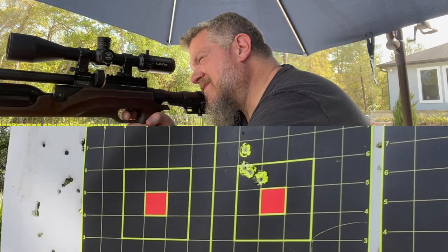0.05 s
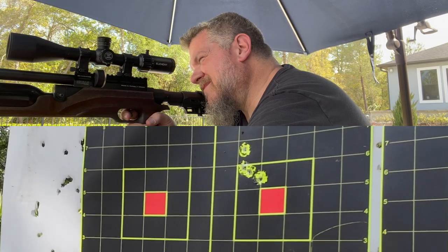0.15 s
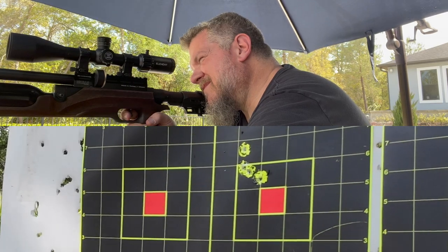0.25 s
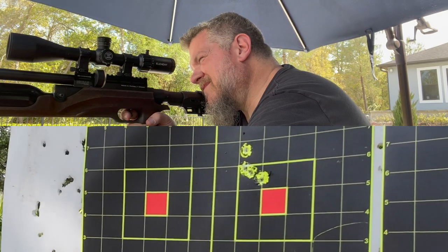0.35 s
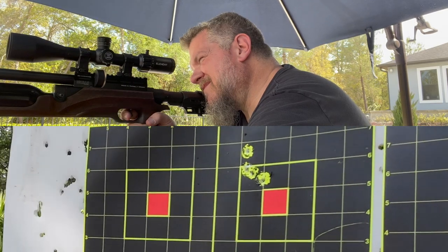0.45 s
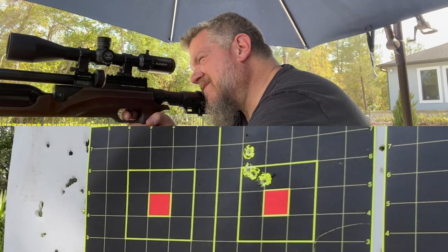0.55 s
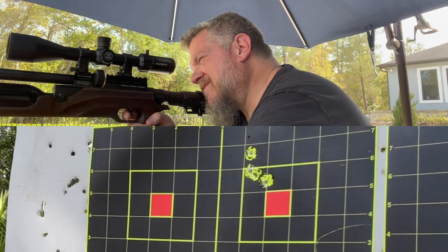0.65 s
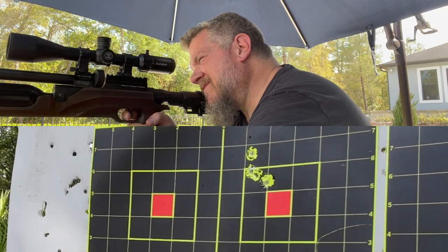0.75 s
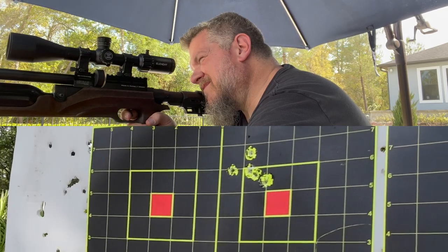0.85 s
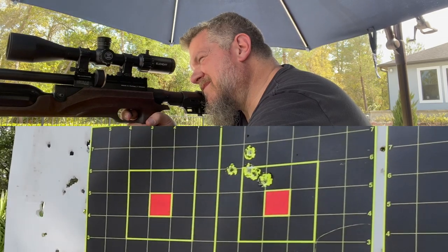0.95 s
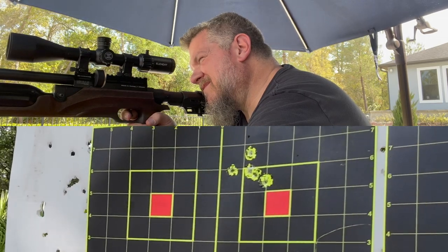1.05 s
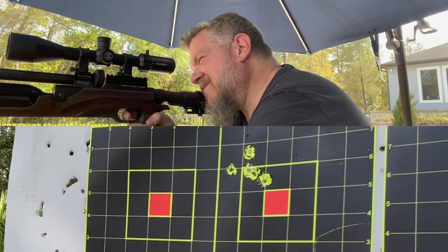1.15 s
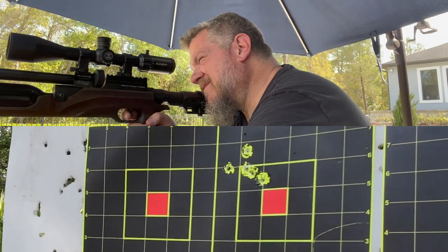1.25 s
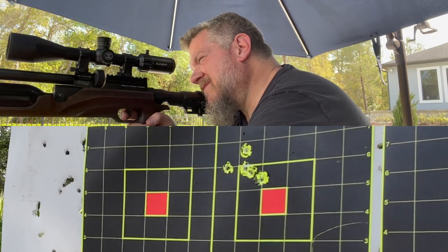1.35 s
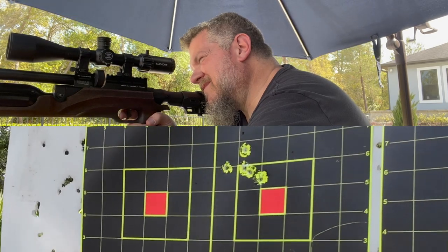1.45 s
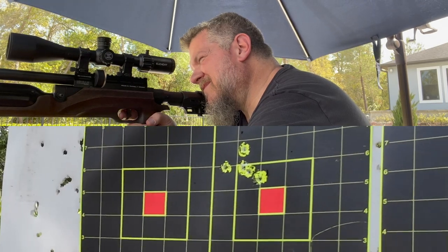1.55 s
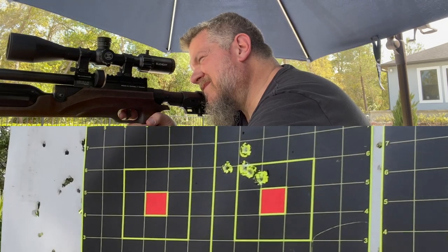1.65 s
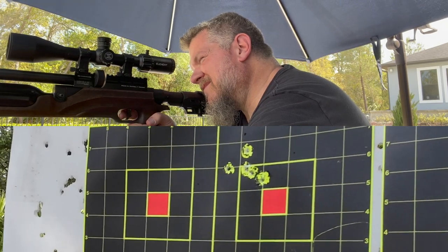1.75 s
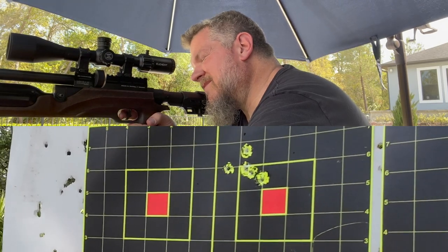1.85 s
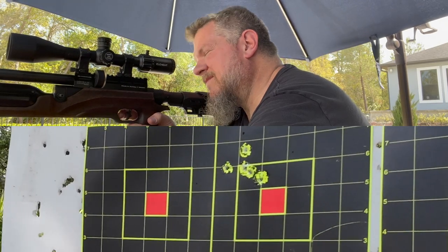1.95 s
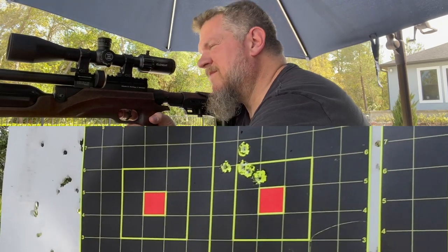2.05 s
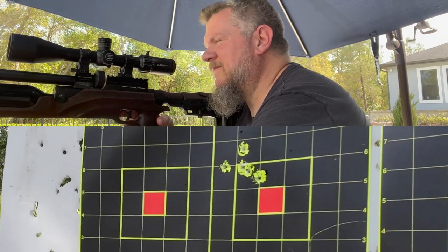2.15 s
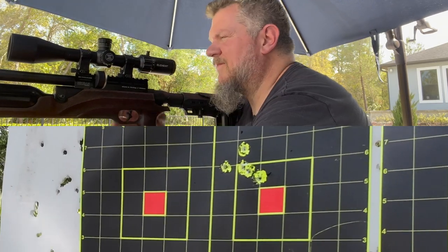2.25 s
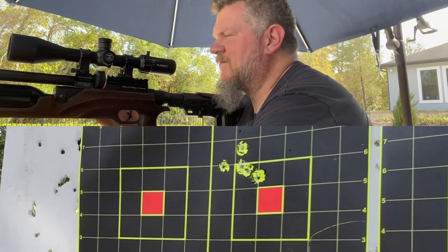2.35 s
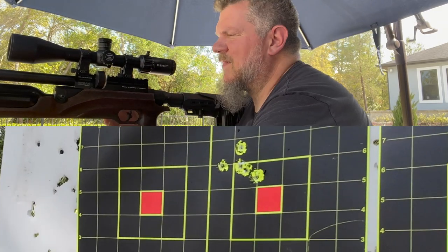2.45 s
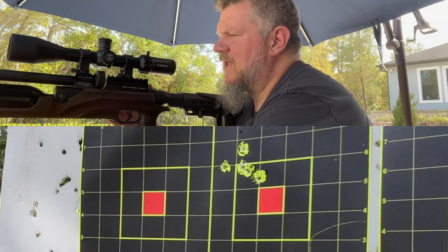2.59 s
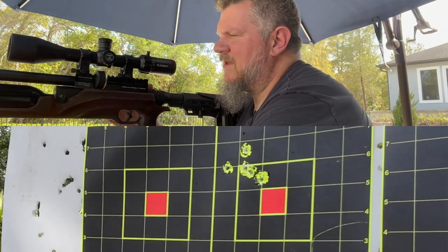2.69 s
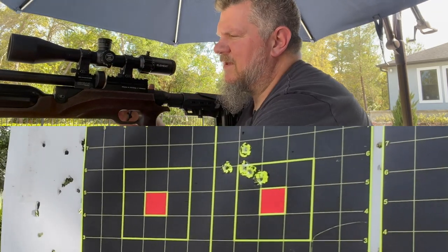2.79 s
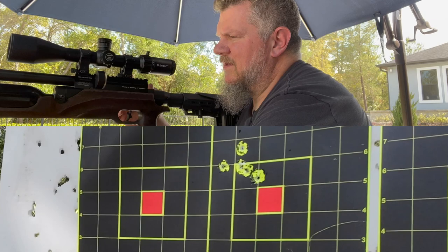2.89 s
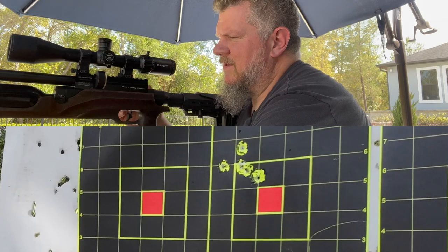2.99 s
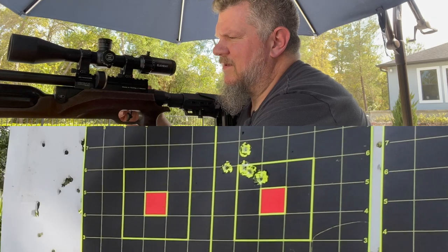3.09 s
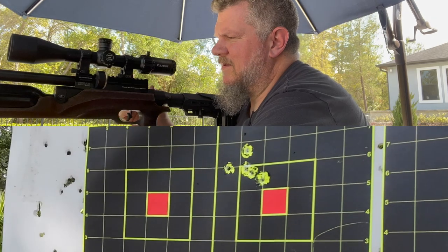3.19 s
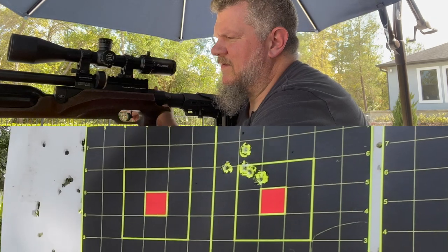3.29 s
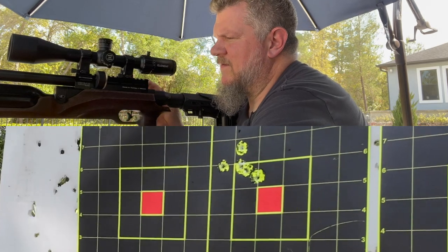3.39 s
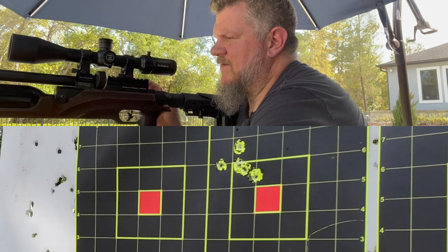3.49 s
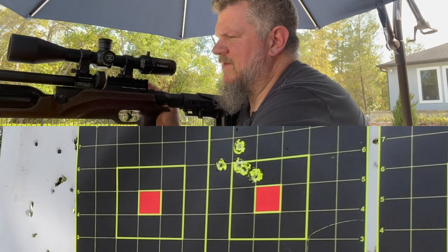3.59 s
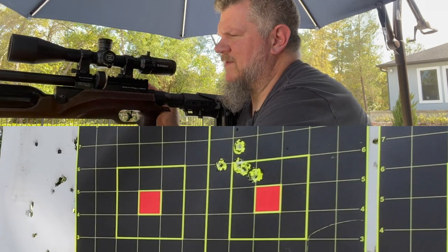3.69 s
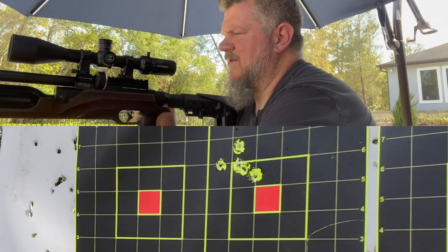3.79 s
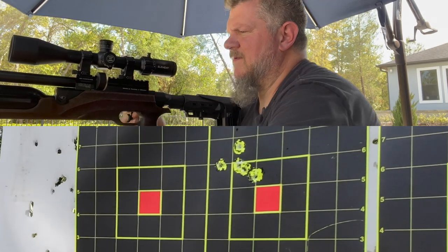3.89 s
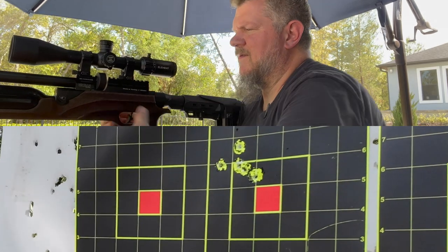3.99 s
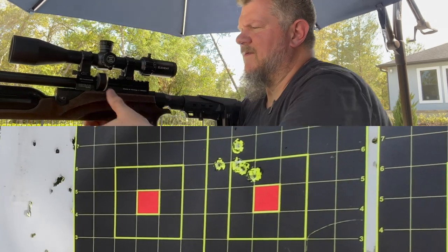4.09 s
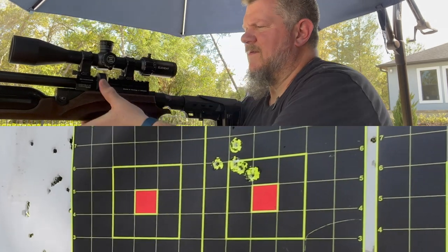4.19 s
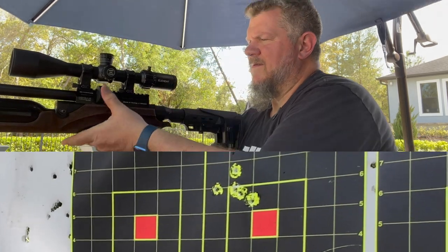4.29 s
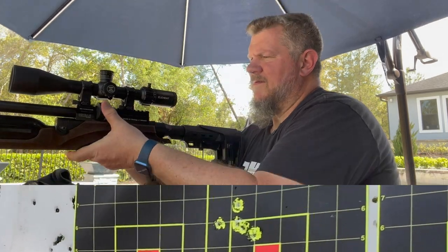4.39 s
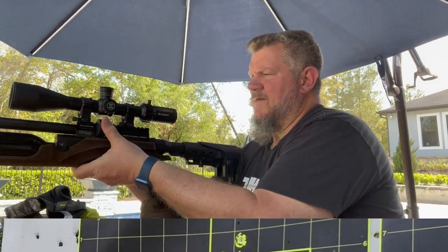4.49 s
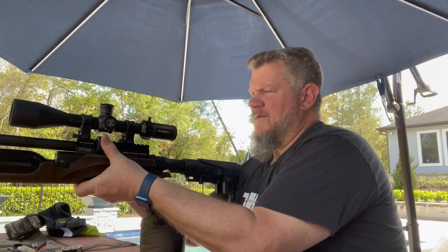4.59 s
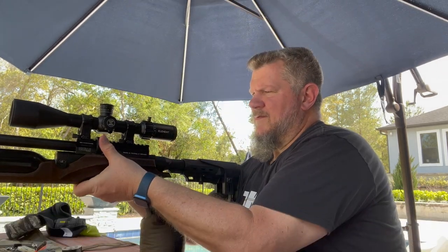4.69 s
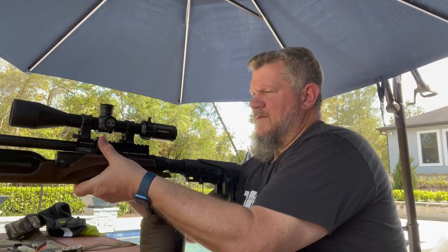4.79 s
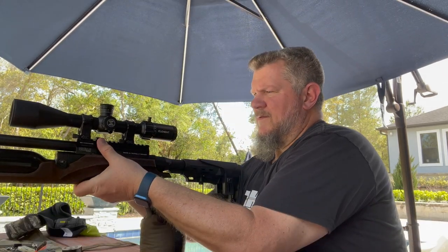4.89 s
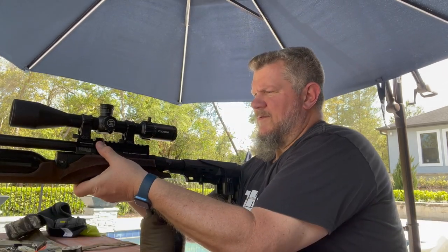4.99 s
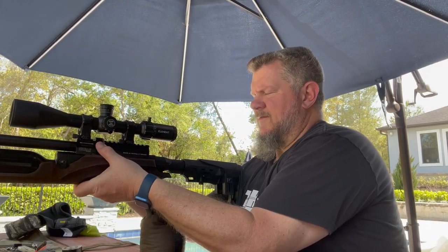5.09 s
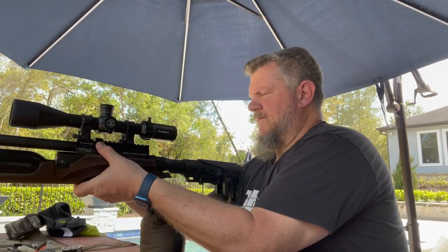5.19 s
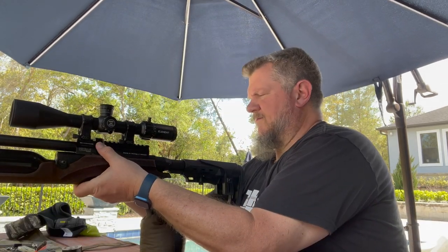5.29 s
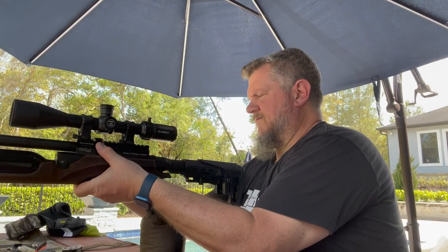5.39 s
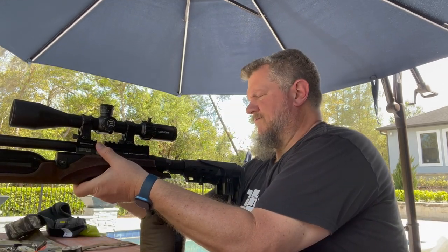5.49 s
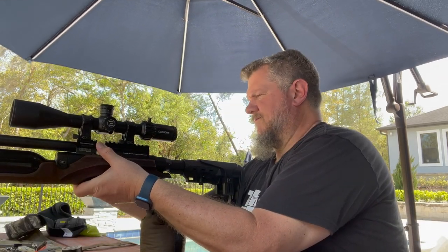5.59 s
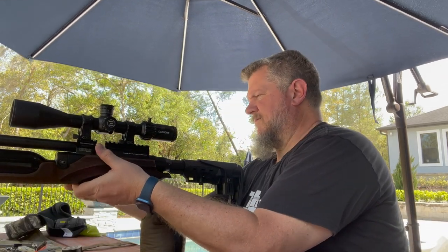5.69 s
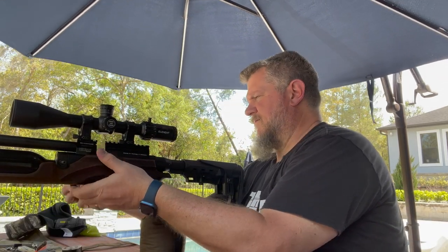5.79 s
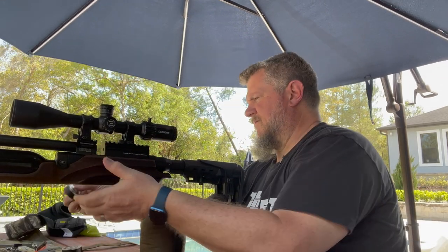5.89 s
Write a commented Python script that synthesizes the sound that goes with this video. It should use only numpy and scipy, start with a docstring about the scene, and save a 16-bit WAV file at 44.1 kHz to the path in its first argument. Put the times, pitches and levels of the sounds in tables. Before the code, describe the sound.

A very quiet outdoor opening with distant road murmur is broken by a single hard air blast, distorting the nearby microphone. The target answers with a crisp smack as the yard echo decays and the air tank rings faintly. Then the rifle is worked: scrapes, bright metal clacks, woody knocks and soft bench thuds, over a slight breeze and cloth rustle.

```python
"""Back yard, one microphone on a small camera close to a compressed-air rifle on a bench.
Far traffic and an engine hum throughout, as shaped noise and a wavering sine; a breeze stirs the microphone.
At 0.8 s one shot: hammer, valve and muzzle puffs of noise, a decaying-noise yard echo, a long sine ping from the tank.
At 1.05 s the pellet slaps the far target, one rung impulse, and faint slaps come back from far surfaces.
From 2.1 s lever and magazine click, knock and slide, as noise rung through steel and wood; soft thuds ring the bench."""
import sys
import numpy as np
from scipy import signal
from scipy.fft import rfft, irfft, next_fast_len
from scipy.io import wavfile
from scipy.ndimage import uniform_filter1d, map_coordinates

SR = 44100
rng = np.random.default_rng(int(sys.argv[2]) if len(sys.argv) > 2 else 0)


def ratio(d):
    """dB to gain"""
    e = np.asarray(d, float) / 20
    return 10 ** e


def generate_wav(sig):
    """Save sig (samples, or channels by samples) to the path in sys.argv[1] as 16-bit PCM at SR."""
    pcm = np.round(np.clip(np.atleast_2d(sig).T, -1, 1) * 32767).astype(np.int16)
    wavfile.write(sys.argv[1], SR, pcm)


N = 262215

# Hammer release, valve opening, muzzle plume. Each row: start [s], level at the top [dB], rise [s], hold [s],
# t60 [s].
AIR_PUFFS = [(0.8031, -24.5, .0015, 0.0023, 0.0088), (0.8083, -3.5, .001, .0078, 0.0047),
             (0.8127, -11, .017, .002, 0.23)]
# Spectrum of the escaping air. Each row: frequency [Hz], relative density [dB per Hz].
BLAST_COLOUR = [(59, -37.5), (100, -6.5), (182, -6), (552, -7.5), (699, -0.5), (761, -11.5), (1070, -7.5),
                (1240, -15), (2460, -8), (3250, -9), (4120, -3), (5320, -6.5), (5790, -8), (15100, -14),
                (16500, -28)]
# Spectrum sent back by house and fence. Each row: frequency [Hz], relative density [dB per Hz].
ECHO_COLOUR = [(100, -8.5), (560, -8.5), (760, -6), (1100, -7.5), (1450, -8), (2500, -8.5), (6000, 0.5),
               (8000, -7.5), (11000, -10), (15500, -13), (16500, -40)]
# Decay of the echo between house and fence. Each row: frequency [Hz], t60 [s].
YARD_DECAY = [(150, 0.45), (700, 0.9), (1800, 1), (4800, 0.7), (8000, 0.66), (11000, 0.46), (15000, .4)]
# Decay of the weak late echo and the far insects' band. Each row: frequency [Hz], t60 [s].
FAR_DECAY = [(700, 1.6), (2000, 2.3), (4400, 4.6), (9000, 2.)]
# Ring of the air tank. Each row: frequency [Hz], starting peak [dB], t60 [s].
TANK_RING = [(1483, -43.5, 2.1)]
# Pellet on the target, then faint slaps from far surfaces. Each row: start [s], peak [dB], centre [Hz],
# width [Hz], t60 [s].
PELLET_SLAPS = [(1.0513, -12, 6220, 7100, 0.028), (1.211, -48.5, 1990, 690, .02),
                (1.293, -63, 7500, 2500, .01), (1.36, -54.5, 3200, 2500, .015),
                (1.466, -53.5, 2300, 904, .015), (1.4794, -46, 6280, 2006, 0.0091)]
# Contacts of lever and magazine. Each row: time [s], peak of the ring [dB], strongest ring [Hz],
# opening rms of the wooden knock [dB re ring peak], opening rms of the bright crack [dB re ring peak].
CONTACTS = [(2.1797, -51.5, 2400, -17.5, -7), (2.2253, -44, 2382, -15.5, -27.5),
            (2.4484, -61, 2720, -21.5, 0), (2.4753, -52.5, 3820, -24.5, -2),
            (2.4931, -54.5, 3780, -23.5, -3), (2.5526, -49.5, 4300, -9.5, -27),
            (2.5774, -57, 3880, -7, -25), (2.7326, -30, 4004, -26, -28.5), (2.7357, -24, 4780, -36.5, -23),
            (2.8387, -48.5, 1870, -31, -31), (2.9275, -34, 3955, -22.5, -19),
            (3.026, -59.5, 2960, -14.5, -9), (3.1203, -58.5, 1508, -18, -32),
            (3.2196, -37.5, 1883, -15, -22.5), (3.2775, -28, 4100, -40, -47), (3.3618, -25, 1898, -39, -23),
            (3.3654, -24, 4200, -60.5, -41), (3.4049, -27, 3840, -25.5, -1.5), (3.4846, -54, 2000, -24, -7),
            (3.4948, -38, 1897, -16, -21), (3.571, -47, 1680, -11, -24), (3.6105, -51, 2030, -13.5, -16.5),
            (3.7472, -40.5, 1700, -14.5, -43.5), (3.8203, -43.5, 2022, -9, -20.5),
            (3.8603, -37.5, 1895, -5.5, -46), (3.989, -48, 1550, -9, -21), (4.0306, -59.5, 1514, -7.5, -19),
            (4.109, -64, 4600, -25, -13.5), (4.405, -69, 5200, -30, -15), (4.6115, -42, 2305, -20.5, -9.5),
            (4.6272, -43.5, 2433, -20, -17), (4.8, -46.5, 1580, -27, -11),
            (4.8746, -53, 1760, -25.5, -15.5), (4.8853, -37.5, 2560, -24.5, -3.5),
            (4.968, -48, 1810, -25, -8), (5.008, -55.5, 1806, -19, -17), (5.047, -68, 3340, -25.5, -20),
            (5.106, -60, 1500, -20.5, -20), (5.059, -45.5, 1450, -31, -29), (5.16, -55.5, 1517, -13, -10.5),
            (5.1682, -47.5, 1858, -25, -24), (5.1834, -58.5, 1870, -12, -22),
            (5.3638, -49, 1960, -12, -28.5), (5.4103, -46.5, 1814, -26.5, -23),
            (5.4284, -43.5, 1200, -17, -31), (5.452, -33, 1585, -17.5, -21),
            (5.5368, -49.5, 1320, -13.5, -14), (5.739, -37.5, 1892, -5, -14),
            (5.8162, -41.5, 1790, -5, -23.5)]
# Modes of the steel action. Each row: frequency [Hz], width [Hz], gain before each contact's own weighting [dB].
ACTION_MODES = [(1240, 910, 5.5), (1671, 870, 7.5), (2116, 120, 7.5), (2720, 330, 4), (3780, 850, 3.5),
                (4200, 450, 7.5), (5090, 320, 2), (5960, 740, 1.5)]
# Modes of the wooden stock and bench. Each row: frequency [Hz], width [Hz], gain before random variation [dB].
STOCK_MODES = [(340, 200, -4), (500, 150, 0), (731, 140, 1), (1050, 200, -1)]
# Parts sliding on the rifle. Each row: start [s], end [s], level before the swell [dB], lower ring [Hz],
# upper ring [Hz].
SLIDE_STROKES = [(2.078, 2.171, -65.5, 1590, 3120), (2.328, 2.437, -78.5, 3415, 4250),
                 (2.42, 2.554, -64.5, 2814, 3750), (2.552, 2.605, -73, 3900, 6550),
                 (2.688, 2.733, -65.5, 1650, 4680), (2.867, 2.947, -61, 2018, 3880),
                 (3.118, 3.19, -73, 1700, 4510), (3.292, 3.366, -63.5, 1700, 3800),
                 (3.783, 3.899, -64, 904, 2170), (4.31, 4.385, -70.5, 1950, 2750),
                 (4.629, 4.675, -61.5, 1438, 2300), (4.893, 4.937, -65, 1836, 2850),
                 (5.411, 5.501, -71, 1198, 2600)]
# Hand or sleeve brushing the stock. Each row: start [s], end [s], level before the swell [dB].
BRUSH_STROKES = [(2.081, 2.174, -65), (2.425, 2.546, -74), (2.695, 2.73, -78.5), (3.776, 3.904, -71.5),
                 (4.306, 4.38, -80.5), (4.628, 4.677, -76), (5.401, 5.508, -70)]
# Weight set down on the bench. Each row: start [s], peak [dB].
BENCH_THUDS = [(3.862, -52.5), (3.991, -52), (4.612, -51.5), (4.629, -46)]
# Modes of the bench top. Each row: frequency [Hz], width [Hz], gain [dB].
BENCH_TOP_MODES = [(62, 21, -1.5), (351, 49, -3)]
# Gusts at the microphone. Each row: middle [s], level added to the calm, before flutter [dB].
WIND_GUSTS = [(2.3, -64), (2.6, -71), (3.3, -70.5), (3.8, -65.5), (4.75, -67), (5.7, -64)]
# Spectrum of wind on the microphone. Each row: frequency [Hz], relative density [dB per Hz].
WIND_COLOUR = [(8, -12.5), (22, -3.5), (50, -4.5), (100, -11.5), (200, -25)]
# Far engine. Each row: time [s], level before wavering [dB].
ENGINE_LEVEL = [(0, -72), (.6, -65.5), (1.66, -65), (2.0, -77.5), (4.45, -75), (4.85, -67.5), (5.35, -72.5),
                (5.95, -67.5)]
# Far road. Each row: time [s], level before wavering [dB].
ROAD_LEVEL = [(0, -69.5), (1.5, -66.5), (4, -69), (5.95, -68.5)]
# Spectrum of the far road. Each row: frequency [Hz], relative density [dB per Hz].
ROAD_COLOUR = [(65, -46), (110, -14), (156, -3.5), (248, -9.5), (324, -10.5), (366, -7.5), (439, -6.5),
               (696, -14), (942, -12), (1120, -23), (2000, -29.5), (2600, -70.5), (4400, -120)]
# How much the shooter moves. Each row: time [s], rustle level before wavering [dB].
MOTION_LEVEL = [(0, -84), (.8, -86.5), (1.45, -74), (1.7, -78.5), (2.6, -73), (3.1, -80), (3.43, -71),
                (3.6, -76), (4.47, -80), (5.39, -79.5), (5.6, -74.5), (5.95, -80.5)]
# Spectrum of the clothing. Each row: frequency [Hz], relative density [dB per Hz].
CLOTHING_COLOUR = [(900, -16), (1500, 0.5), (3000, -2.5), (5000, -5.5), (8000, -12), (15000, -19.5)]
# Spectrum of the microphone's own hiss. Each row: frequency [Hz], relative density [dB per Hz].
MIC_HISS_COLOUR = [(1000, -11.5), (2000, -2.5), (8000, -0.5), (14500, -4), (15500, -14.5)]


def unit(x):
    """Scale to rms 1."""
    return x / np.sqrt(np.mean(x ** 2) + 1e-20)


def along(points, hz):
    """Read (Hz, value) points on a log frequency axis."""
    f, v = np.transpose(points)
    return np.interp(np.log(hz + 1), np.log(f + 1), v)


def curve(rows):
    """One value per sample from (s, value) rows."""
    s, values = np.transpose(rows)
    return np.interp(np.arange(N) / SR, s, values)


def wobble(rate):
    """A smooth random curve with rate knots a second."""
    knots = rng.standard_normal(int(N * rate / SR) + 4)
    return map_coordinates(knots, [np.arange(N) * rate / SR])


def filtered(x, response):
    """Pass x through a complex response of frequency."""
    m = next_fast_len(len(x) + 8192)
    spectrum = rfft(x, m) * response(np.fft.rfftfreq(m, 1 / SR))
    return irfft(spectrum, m)[:len(x)]


def noise(colour):
    """Coloured noise of rms 1, falling away outside the table."""
    closed = [(0.006, -120)] + list(colour) + [(colour[-1][0] * 2, -120)]
    return unit(filtered(rng.standard_normal(N), lambda hz: ratio(along(closed, hz))))


def resonance(f, hz, width):
    """Causal response of one damped mode."""
    return 1j * f * width / (hz * hz - f * f + 1j * f * width)


def body(x, modes, gains):
    """Ring x through modes of alternating sign, scaled to peak 1."""
    def response(f):
        total = 0
        for k, ((hz, width, db), gain) in enumerate(zip(modes, gains)):
            total = total + (-1) ** k * gain * ratio(db) * resonance(f, hz, width)
        return total
    y = filtered(x, response)
    return y / np.abs(y).max()


def add(out, s, x):
    """Mix x into out at time s."""
    part = out[round(s * SR):][:len(x)]
    part += x[:len(part)]


def fading(t60s, size):
    """Noise in which each frequency dies at its own speed, from rms 1."""
    hz, t, z = signal.stft(rng.standard_normal(size), SR, nperseg=256)
    decay = ratio(-60 * t / along(t60s, hz)[:, None])
    return signal.istft(z * decay, SR, nperseg=256)[1][:size]


def puff_level():
    """Level of the escaping air: each puff rises, holds and dies."""
    plume_ends_s, plume_end_t60_s = 0.862, 0.12  # the valve shuts and the plume dies faster
    t = np.arange(N) / SR
    level = np.zeros(N)
    for s, db, rise, hold, t60 in AIR_PUFFS:
        decay_db = -60 * np.maximum(t - s - rise - hold, 0) / t60
        level += ratio(db + decay_db) * np.clip((t - s) / rise, 0, 1)
    return level * ratio(-60 * np.maximum(t - plume_ends_s, 0) / plume_end_t60_s)


def blast():
    """Escaping air: coloured noise whose treble fades sooner as the pressure falls."""
    treble_hz, treble_t60_s = 7500, 0.3
    jet = noise(BLAST_COLOUR)
    treble = filtered(jet, lambda f: 1 / (1 + (treble_hz / (f + 1)) ** 6))
    since_plume = np.maximum(np.arange(N) / SR - AIR_PUFFS[-1][0], 0)
    treble_left = ratio(-60 * since_plume / treble_t60_s)
    return puff_level() * ratio(1.5 * wobble(300)) * (jet - (1 - treble_left) * treble)


def echoes():
    """House and fence return decaying noise; faint far insects sing in a narrow band near 4.4 kHz over a weak
    late echo."""
    yard_edge_s, beyond_db = 0.119, -3  # echo time of the last fence; the echo drops past it
    out, t = np.zeros(N), np.arange(2 * SR) / SR
    rise = 1 - np.exp(-t / 0.013)

    def colour(hz):
        return ratio(along(ECHO_COLOUR, hz))

    def insects(hz):  # far insects sing in one narrow band near 4.4 kHz, over a weak late echo
        return 0.28 * colour(hz) + resonance(hz, 4400, 500) ** 2

    past_fence = np.clip((t - yard_edge_s) / 0.019, 0, 1)
    yard_level = ratio(-18 + beyond_db * past_fence + 1.2 * wobble(52)[:len(t)])
    add(out, 0.81, yard_level * rise * filtered(fading(YARD_DECAY, len(t)), colour))
    add(out, 0.81, ratio(-55) * rise * filtered(fading(FAR_DECAY, len(t)), insects))
    return out


def tank():
    """The air tank pings as a decaying sine."""
    out, t = np.zeros(N), np.arange(2 * SR) / SR
    for hz, db, t60 in TANK_RING:
        add(out, 0.808, ratio(db - 60 * t / t60) * np.sin(2 * np.pi * hz * t))
    return out


def pellet():
    """Each slap is one impulse, then shreds of noise, rung through a broad mode."""
    out, t = np.zeros(N), np.arange(2048) / SR
    for s, db, hz, width, t60 in PELLET_SLAPS:
        shreds = 0.035 * rng.standard_normal(2048) * ratio(-60 * t / t60)
        snap = shreds + (t == 0)
        dulled = filtered(snap, lambda f: resonance(f, hz, width) / (1 + 1j * f / 9000) ** 2)
        add(out, s, ratio(db) * body(dulled, [(hz, width, 0)], [1]))
    return out


def opening_unit(x, size):
    """Scale to rms 1 over the first size samples."""
    return x / np.sqrt(np.mean(x[:size] ** 2))


def handling():
    """Each contact is a short rattle that rings the action near its own pitch, knocks the stock and cracks."""
    stock_t60_s, stock_tail_db = 0.19, -12  # the stock and bench shake on after a knock
    out, t = np.zeros(N), np.arange(SR // 5) / SR
    pitches = np.array([mode[0] for mode in ACTION_MODES])
    for s, db, hz, knock_db, crack_db in CONTACTS:
        # a rattle lasts longer the lower it rings and the more wood is in it
        t60 = 0.074 * (2000 / hz) ** 0.96 * ratio(0.23 * knock_db)
        envelope = (ratio(-60 * t / t60) + 0.96 * ratio(-60 * t / 0.018)) * (1 - np.exp(-t / 0.00065))
        rattle = rng.standard_normal((3, len(t))) * envelope

        octaves_off = np.abs(np.log2(pitches / hz))
        near = ratio(-7 * octaves_off + rng.normal(0, 2.2, len(ACTION_MODES)))
        in_step = (-1) ** np.argmin(np.abs(pitches - hz))  # same sign as the neighbouring mode
        dulled = filtered(rattle[0], lambda f: 1 / (1 + 1j * f / 6000))
        ring = body(dulled, list(ACTION_MODES) + [(hz, 400, 4)], [*near, in_step])

        shaking = ratio(stock_tail_db - 60 * t / stock_t60_s) * rng.standard_normal(len(t))
        knock = body(rattle[1] + shaking, STOCK_MODES, ratio(rng.normal(0, 2.3, len(STOCK_MODES))))
        crack = body(rattle[2] * ratio(-60 * t / 0.046), [(7500, 21000, 0.5), (13500, 5000, -2)], [1, 1])

        contact = ring + ratio(knock_db) * opening_unit(knock, 220) + ratio(crack_db) * opening_unit(crack, 70)
        add(out, s - 0.0003, ratio(db) * contact)
    return out


def stroke(start, end):
    """A gritty swell of friction between two times."""
    size = round((end - start) * SR)
    swell = np.sin(np.linspace(0, np.pi, size)) ** 0.55
    grit = unit(uniform_filter1d(rng.standard_normal(8192), size=90))
    return swell * ratio(2.9 * grit)[:size]


def dry_hiss():
    """Broad bright friction noise of rms 1."""
    return unit(filtered(rng.standard_normal(8192), lambda f: resonance(f, 6000, 7100) ** 2))


def slides():
    """Lever and magazine rub with noise in two rings and a little hiss."""
    out = np.zeros(N)
    for start, end, db, low_hz, high_hz in SLIDE_STROKES:
        width = 110 + 0.44 * (high_hz - low_hz)  # Hz, grows with the gap between the rings

        def rings(f):
            return resonance(f, low_hz, width) ** 2 + resonance(f, high_hz, width) ** 2

        rub = unit(filtered(rng.standard_normal(8192), rings))
        shape = stroke(start, end)
        friction = rub + ratio(-20) * dry_hiss()
        add(out, start, ratio(db) * shape * friction[:len(shape)])
    return out


def brushes():
    """Hand and sleeve brush the stock with a dry hiss."""
    out = np.zeros(N)
    for start, end, db in BRUSH_STROKES:
        shape = stroke(start, end)
        add(out, start, ratio(db) * shape * dry_hiss()[:len(shape)])
    return out


def thuds():
    """A soft push rings the bench top."""
    out, t = np.zeros(N), np.arange(SR // 5) / SR
    ring = body(t * np.exp(-t / 0.00069), BENCH_TOP_MODES, [1, 1])
    for s, db in BENCH_THUDS:
        add(out, s, ratio(db) * ring)
    return out


def bench_reflections(x):
    """Short answer of table, sunshade and wall: x convolved with fading noise, 200 samples late."""
    tail = fading([(500, 0.32), (4000, 0.084), (12000, 0.16)], SR // 2)  # (Hz, t60 s)
    return signal.fftconvolve(np.pad(x, (200, 0)), tail / np.linalg.norm(tail))[:N]


def wind():
    """Breeze tumbling on the microphone: low noise in smooth gusts over a calm."""
    calm_db, gust_s = -69.5, 0.19  # calm level; time from a gust's middle to 1/e of its top
    t = np.arange(N) / SR
    blow = ratio(calm_db) + sum(ratio(db) * np.exp(-((t - s) / gust_s) ** 2) for s, db in WIND_GUSTS)
    return blow * ratio(2.5 * wobble(8)) * noise(WIND_COLOUR)


def engine():
    """A far engine hums as a sine near 76 Hz, wavering in pitch and level."""
    level = ratio(curve(ENGINE_LEVEL) + 2.5 * wobble(5))
    phase = 2 * np.pi * np.cumsum(76 + 3.5 * wobble(4)) / SR
    return level * np.sqrt(2) * np.sin(phase)


def traffic():
    """The far road murmurs as slowly wavering low noise."""
    return ratio(curve(ROAD_LEVEL) + 0.8 * wobble(2.4)) * noise(ROAD_COLOUR)


def rustle():
    """Clothing rubs as the shooter moves: wavering coloured noise."""
    return ratio(curve(MOTION_LEVEL) + 1.5 * wobble(15)) * noise(CLOTHING_COLOUR)


def microphone_hiss():
    """The microphone's own steady noise."""
    return ratio(-87.5) * noise(MIC_HISS_COLOUR)


def scene():
    """Everything at the one microphone."""
    near = handling() + slides() + brushes() + thuds()
    shot = blast() + echoes() + tank() + pellet()
    reflected = ratio(-16) * bench_reflections(near)
    background = wind() + engine() + traffic() + rustle() + microphone_hiss()
    return (shot + near + reflected + background)[None]


def low_pass(x):
    """Removes everything above the highest recorded frequency."""
    return signal.sosfilt(signal.butter(12, 16650, fs=SR, output="sos"), x)


def record(dry):
    """The microphone overloads: tops are squashed, and what is cut off makes its rest point sag and swing back."""
    ceiling, sag_hz, sag_width_hz = 0.37, 13, 11
    squashed = dry[0] / (1 + np.abs(dry[0] / ceiling) ** 3) ** (1 / 3)
    cut_off = np.abs(dry[0] - squashed)
    sag = filtered(cut_off, lambda f: resonance(f, sag_hz, sag_width_hz))
    mix = (squashed - ratio(1) * sag)[None]
    return low_pass(mix)


dry = scene()
out = record(dry)
generate_wav(out)
```